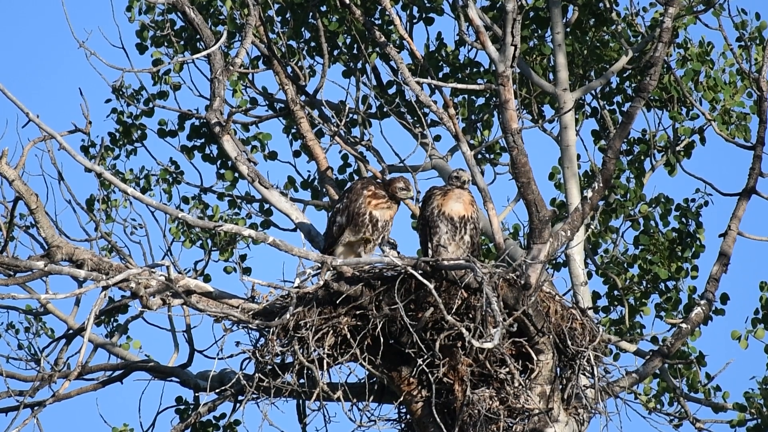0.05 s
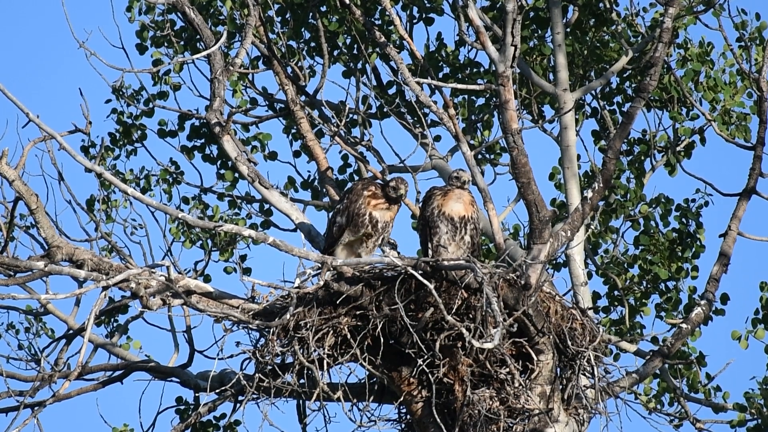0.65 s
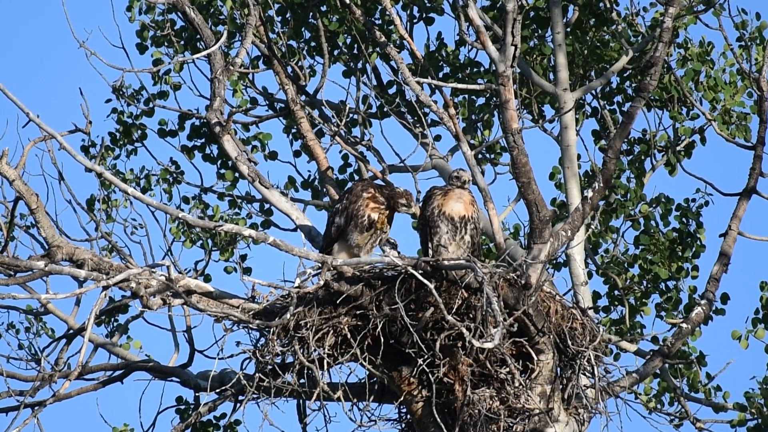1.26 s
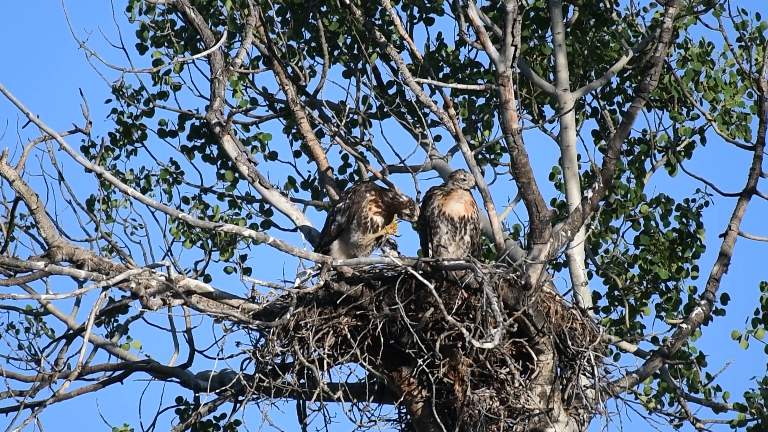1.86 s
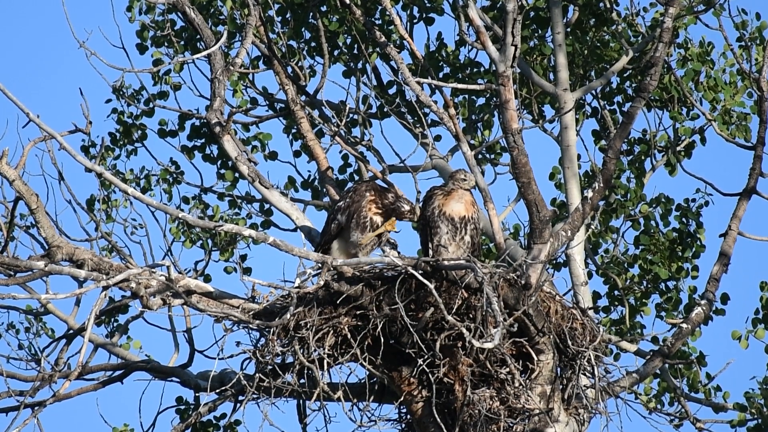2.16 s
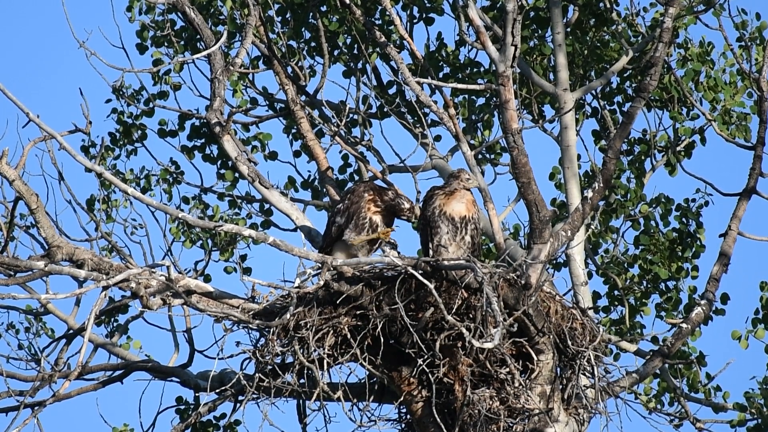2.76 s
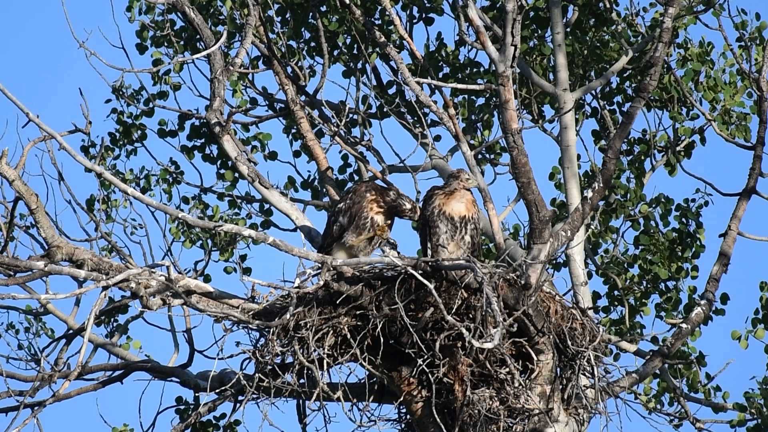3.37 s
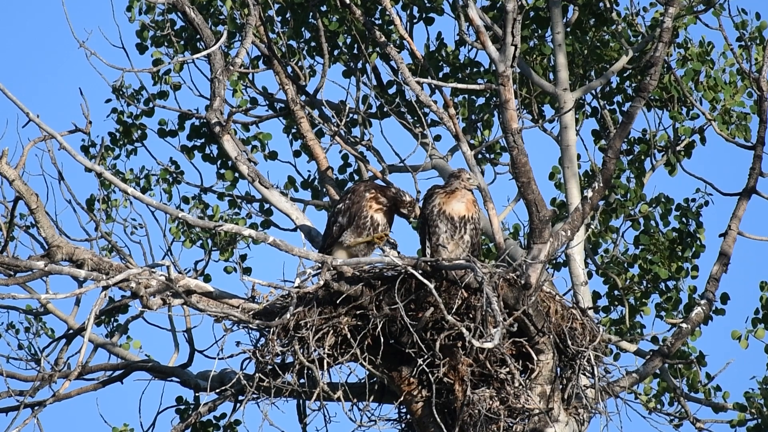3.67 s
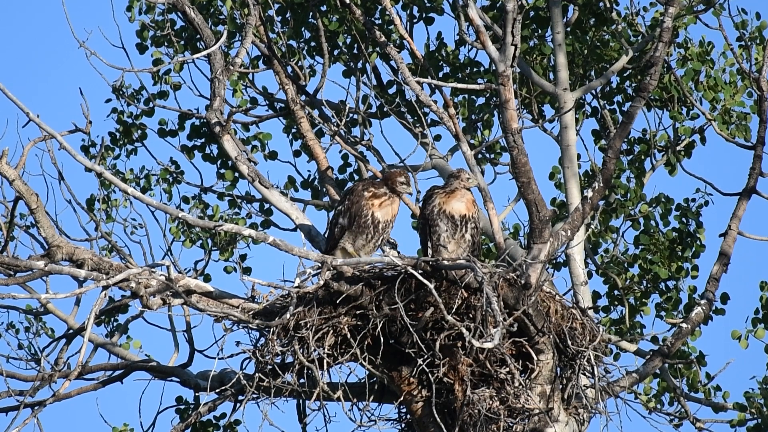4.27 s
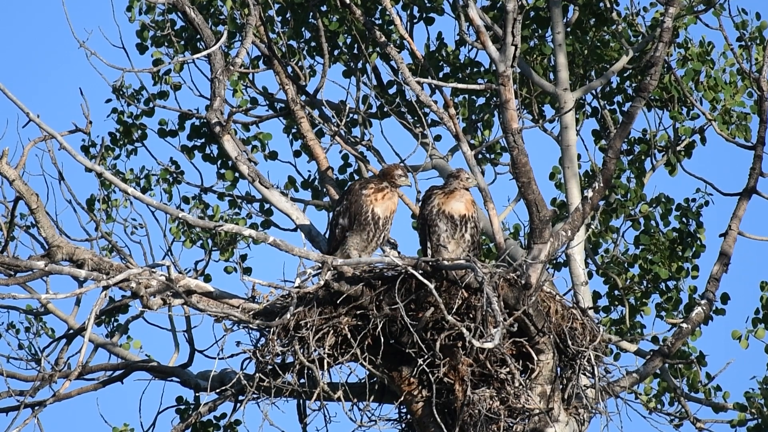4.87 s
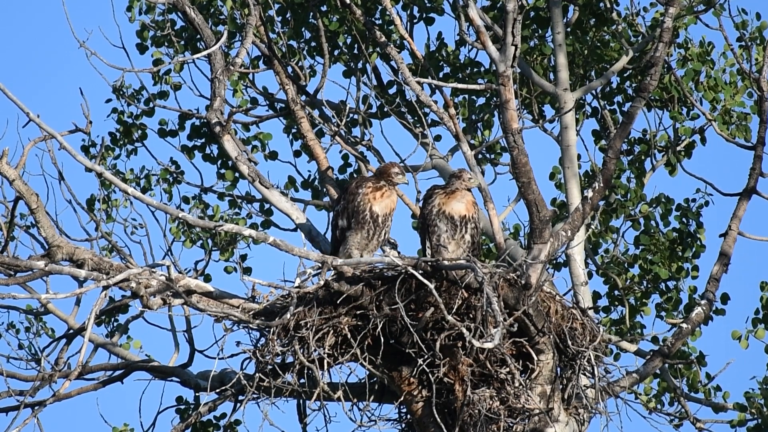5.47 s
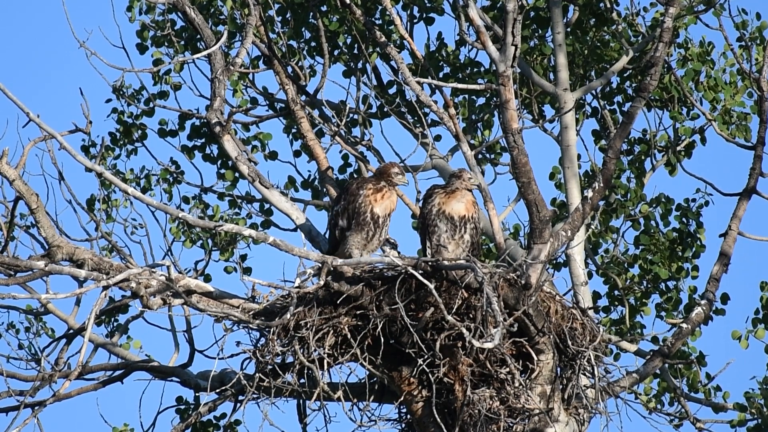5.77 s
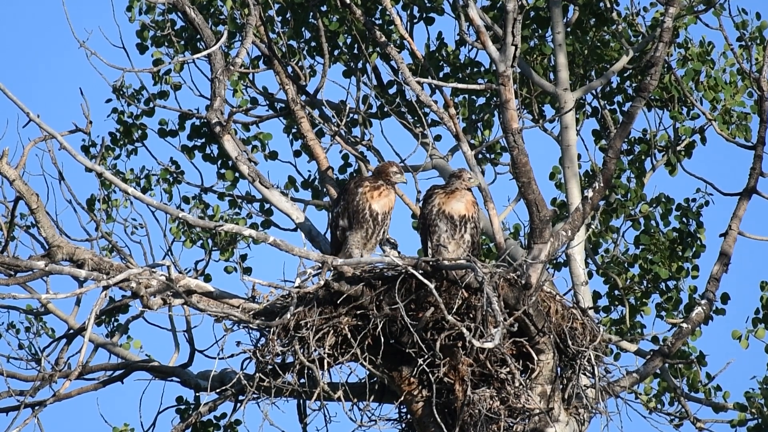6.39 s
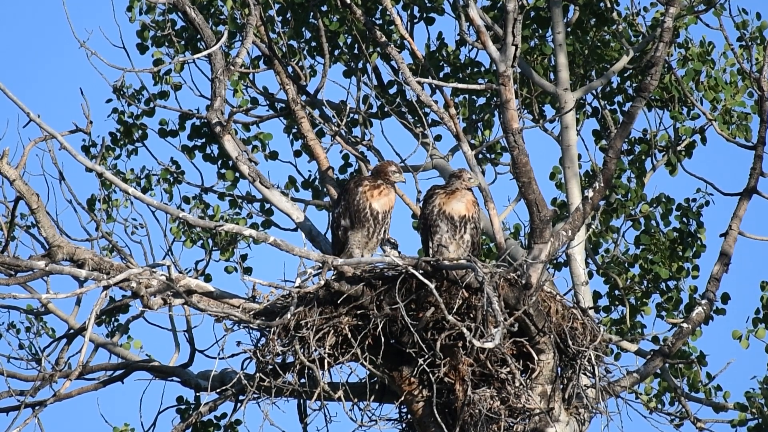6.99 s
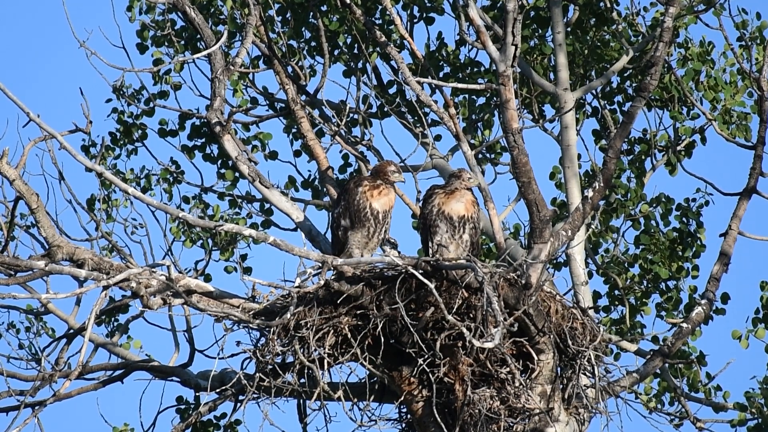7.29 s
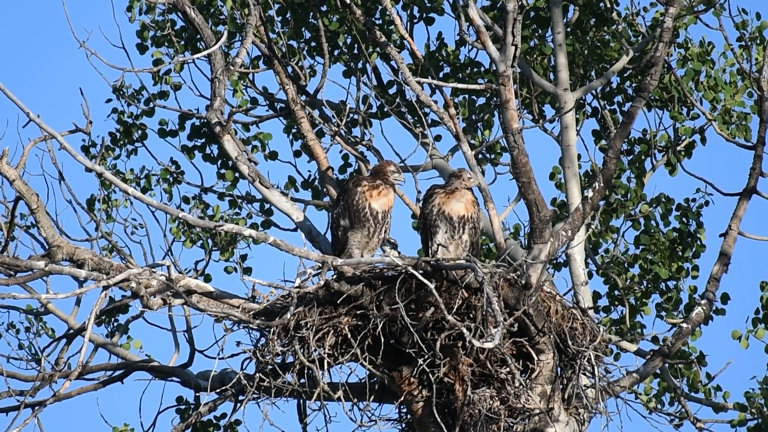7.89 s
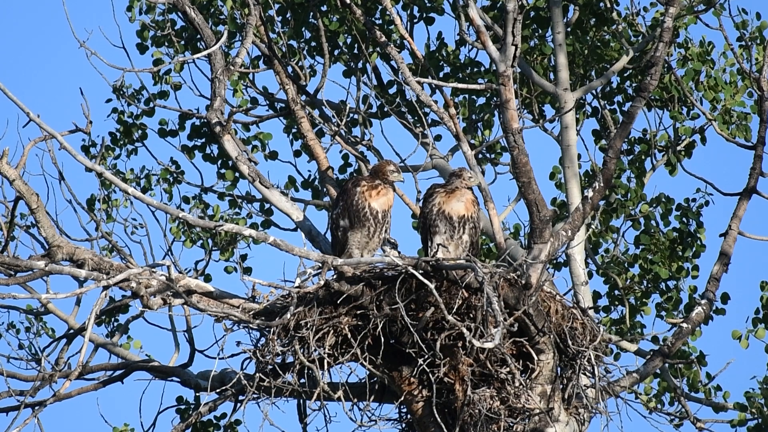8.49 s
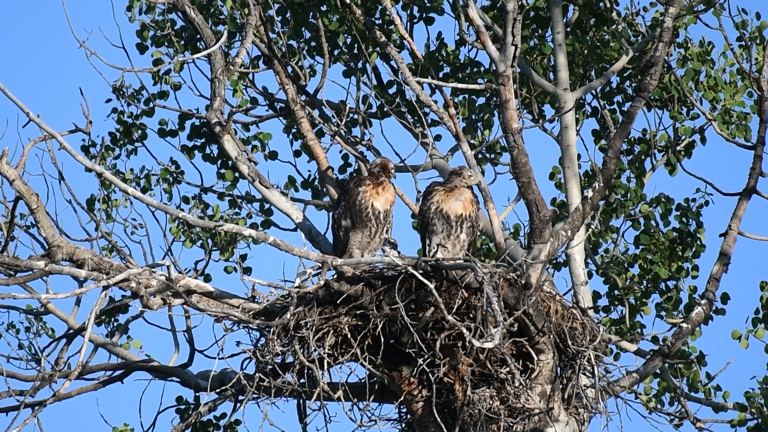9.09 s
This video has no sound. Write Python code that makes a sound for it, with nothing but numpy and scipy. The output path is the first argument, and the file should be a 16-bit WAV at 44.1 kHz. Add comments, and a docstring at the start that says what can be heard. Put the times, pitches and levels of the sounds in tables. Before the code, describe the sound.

Young hawks give thin, cracking whistles in a tree, after a nearer songbird sings one quick, loud phrase over faint distant chirps.

```python
"""A soft hush of air and microphone hiss comes first, and in it a faint whistle from a nest high in a leafy
tree, left of the microphones. Two young hawks call there, louder later on, their voices cracking between a low
and a high register. Three dry ticks and two hoarse squawks pass; small birds chirp far off. A nearer songbird
sings one quick, loud phrase of gliding notes. Leaves scatter every call on its way to the stereo pair, and two
narrow notches dip the treble."""
import sys
import numpy as np
from scipy import signal
from scipy.fft import rfft, irfft
from scipy.io import wavfile
from scipy.ndimage import uniform_filter1d

SR = 44100
rng = np.random.default_rng(int(sys.argv[2]) if len(sys.argv) > 2 else 0)


def generate_wav(sig):
    """Save sig (samples, or channels by samples) to the path in sys.argv[1] as 16-bit PCM at SR."""
    pcm = np.round(np.clip(np.atleast_2d(sig).T, -1, 1) * 32767).astype(np.int16)
    wavfile.write(sys.argv[1], SR, pcm)


N = 407484
TIME = np.arange(N) / SR
ALONG = np.linspace(0, 1, 101)  # share of the way through a note or one flank of it


def from_db(db):
    """Decibels to gain."""
    return 10 ** (np.asarray(db) / 20)


def at_hz(points, hz):
    """Read a spectrum on a log-frequency axis."""
    f, value = np.transpose(points)
    return np.interp(np.log(np.maximum(hz, 1)), np.log(f), value)


def drift(size, rate):
    """A random wander of spread about 1, turning rate times a second."""
    steps = np.arange(size) * rate / SR
    return np.interp(steps, np.arange(2048), rng.standard_normal(2048))


def contour(rows, glide_s=.003, edge_s=.0027):
    """A note's first sample, its soft on-off gate, and its columns joined with rounded corners."""
    s, *columns = np.transpose(rows)
    s = np.maximum.accumulate(s)
    t = np.arange(s[0] - edge_s, s[-1] + edge_s, 1 / SR)
    from_edge_s = np.minimum(t - t[0], t[-1] - t)
    gate = np.sin(np.pi / 2 * np.clip(from_edge_s / (2 * edge_s), 0, 1)) ** 2
    curves = [uniform_filter1d(np.interp(t, s, c), max(int(glide_s * SR), 1)) for c in columns]
    return max(int(t[0] * SR), 0), gate, *curves


def arch(times, pitches, rise, fall, hold_s=0):
    """Times and pitches of a note that climbs and comes down; rise and fall run from foot 0 to top 1."""
    (start_s, top_s, end_s), (start_hz, top_hz, end_hz) = times, pitches
    s = np.r_[start_s + (top_s - start_s) * ALONG, np.linspace(top_s + hold_s, end_s, len(ALONG))]
    return s, np.r_[start_hz + (top_hz - start_hz) * rise, end_hz + (top_hz - end_hz) * fall[::-1]]


def tone(hz, level_db):
    """A gliding sine of the given rms level."""
    return np.sqrt(2) * from_db(level_db) * np.sin(2 * np.pi * np.cumsum(hz) / SR)


def add(track, start, sound):
    """Mix a sound into a track."""
    part = track[..., start:start + sound.shape[-1]]
    part += sound[..., :part.shape[-1]]


def panned(x, left_db):
    """Share a sound between the two microphones at constant power."""
    gains = from_db(np.array([[1], [-1]]) * left_db / 2)
    return x * gains / np.sqrt(np.mean(gains ** 2, axis=0))


def left_leads(pair, lead_s):
    """A sound from the left reaches the right microphone later."""
    return np.array([pair[0], np.interp(TIME - lead_s, TIME, pair[1])])


def foliage(pair, near_db, near_t60, far_db, far_t60):
    """Direct sound, a quick scatter off nearby twigs and a longer one off the trees around."""
    t = TIME[:SR]
    out = pair
    for level_db, t60 in ((near_db, near_t60), (far_db, far_t60)):
        echoes = rng.standard_normal((2, SR)) * from_db(-60 * t / t60) * (1 - np.exp(-t / .012))
        echoes /= np.sqrt(np.sum(echoes ** 2, axis=1, keepdims=True))
        out = out + from_db(level_db) * signal.fftconvolve(pair, echoes, axes=1)[:, :N]
    return out


# open air and microphone hiss: f/Hz, density/dB per Hz
HUSH_SPECTRUM = [(25, -117), (60, -107), (120, -101), (200, -97.5), (400, -97), (800, -99), (1500, -99),
                 (2100, -100), (3500, -101), (5000, -103), (7000, -107), (9500, -109), (15000, -115)]
# how alike the two microphones hear it: f/Hz, likeness/0-1
MIC_LIKENESS = [(60, 0.66), (130, 1), (290, 0.98), (640, 0.77), (1400, 0), (15000, 0.12)]
# thin whine of the electronics: f/Hz, level/dB
WHINE_TONES = [(5265, -91), (10530, -96), (11703, -94), (12871, -100), (14045, -101)]
def hush():
    """Steady noise, alike at both microphones in the bass and unrelated above, with a faint whine."""
    hz = np.fft.rfftfreq(N, 1 / SR)
    mid, side = rfft(rng.standard_normal((2, N)))
    alike = at_hz(MIC_LIKENESS, hz)
    pair = np.sqrt(1 + alike) * mid + np.sqrt(1 - alike) * side * [[1], [-1]]
    air = irfft(pair * from_db(at_hz(HUSH_SPECTRUM, hz)), N) * np.sqrt(SR) / 2
    return air + sum(tone(np.full(N, f), db) for f, db in WHINE_TONES)


def cracking_whistle(row, crack_s=.004, fade_in_db=14, lead_sag=.18, tail_sag=.13):
    """A high arch, most often cracking up from a low lead-in and down to a low tail: t/s, f/Hz, level/dB."""
    shape, hold_s, fade_s, _, level_db, _, lead_s, lead_db, tail_s, tail_db, crack_hz = row[6:]
    start_s, _, end_s = row[:3]
    flank = np.sin(np.pi / 2 * ALONG) ** shape
    s, hz = arch(row[:3], row[3:6], flank, flank, hold_s)
    parts = [(s, hz, level_db - fade_in_db * np.clip(1 - (s - start_s) / fade_s, 0, 1))]
    # the low register is lower and softer the farther it is from the crack
    if lead_s > crack_s:
        away = (1 - ALONG) ** 2
        lead_hz = crack_hz * (1 - lead_sag * away)
        parts.insert(0, (start_s - crack_s - lead_s * (1 - ALONG), lead_hz, lead_db - 3 * away))
    if tail_s > crack_s:
        tail_hz = crack_hz * (1 - tail_sag * ALONG ** .8)
        parts.append((end_s + crack_s + tail_s * ALONG, tail_hz, tail_db - 6 * ALONG))
    return np.hstack(parts).T


# calls from the nest, levels before the throat (the second row is the whistled start of the first squawk):
# start t/s, top t/s, end t/s, start f/Hz, top f/Hz, end f/Hz, arch shape (under 1 flat, 2 bell-like), hold/s,
# fade-in/s, lean left/dB, level/dB, extra octave/dB, lead-in/s, lead-in level/dB, tail/s, tail level/dB, low
# side of the crack f/Hz
HAWK_CALLS = [ (0.03, 0.11, 0.2, 3085, 3060, 3080, 1, 0, .08, 14, -67, -6, 0, 0, 0, 0, 0),
              (0.562, 0.571, 0.612, 3280, 3360, 3000, 2, 0, .003, 13, -51.5, -11, 0, 0, 0, 0, 0),
              (3.795, 3.93, 4.05, 2970, 3285, 3160, 1.1, 0, .03, 7.5, -64.5, 0, 0, 0, 0, 0, 0),
              (4.05, 4.17, 4.232, 3110, 3295, 3120, 2, 0, .025, 7.5, -60.5, -6, 0, 0, 0, 0, 0),
              (4.716, 4.838, 4.91, 3345, 3810, 3350, 2, 0, .028, 5.3, -49.5, -9, .055, -58, .04, -60, 2500),
              (5.243, 5.262, 5.41, 3400, 3400, 2720, 1.8, .01, .012, 4.5, -53.5, -6, .11, -53.5, .048, -52.5, 2580),
              (5.319, 5.472, 5.546, 3330, 4220, 3350, 2.1, 0, .003, 5, -49.5, -9, .048, -58, .025, -59, 2530),
              (5.965, 6.088, 6.211, 3300, 4380, 3330, 1.8, .062, .015, 7.3, -48.5, -2, .033, -59, .024, -60, 2480),
              (6.116, 6.125, 6.24, 3270, 3255, 3110, .7, .085, .003, 6.7, -49, -5, .152, -51, .044, -48.5, 2680),
              (6.773, 6.89, 7.03, 3150, 3385, 3080, .9, .1, .002, 4.9, -47.5, 1, .033, -55, .037, -49, 2620),
              (7.7, 7.93, 7.991, 2850, 3410, 3110, .5, 0, .025, 6.3, -49, 4, 0, 0, .04, -46.5, 2700), ]
# the throat each call glides through: f/Hz, fundamental gain/dB, octave against it/dB
HAWK_THROAT = [(2100, -6, -11), (2330, 0, -5), (2700, 0, -4), (2780, -6, -17), (2950, -7, -17),
               (3100, 2, -11), (3260, 0.5, -20), (3400, 0.5, -21.5), (3520, -4, -28), (3700, -12.5, -24),
               (3950, -11, -21), (4280, -1.5, -21)]
def hawks(waver=.0037, rasp=.006, flutter_db=1.9, third_db=-19, low_share=.4):
    """High in the tree, to the left: nearly pure whistles whose octave stands out in the low register."""
    out = np.zeros((2, N))
    throat_hz, pass_db, second_db = np.transpose(HAWK_THROAT)
    for row in HAWK_CALLS:
        left_db, _, extra_db = row[9:12]
        start, gate, hz, effort_db = contour(cracking_whistle(row))
        level_db = effort_db + np.interp(hz, throat_hz, pass_db)
        extra_share = at_hz([(2650, low_share), (2850, 1)], hz)
        octave_db = level_db + extra_share * extra_db + np.interp(hz, throat_hz, second_db)
        # the voice drops out for an instant while it cracks between registers
        octaves_per_s = np.abs(np.gradient(np.log2(hz))) * SR
        gate = gate / (1 + (octaves_per_s / 35) ** 4)
        hz = hz * (1 + waver * drift(len(hz), 119) + rasp * drift(len(hz), 1200))
        partials = [(1, level_db), (2, octave_db), (3, octave_db + third_db)]
        voice = sum(tone(k * hz, db + at_hz([(8000, 0), (13000, -20)], k * hz)) for k, db in partials)
        flutter = from_db(flutter_db * drift(len(hz), 123.2))
        add(out, start, panned(voice * gate * flutter, left_db))
    return foliage(out, near_db=-14, near_t60=.15, far_db=-11, far_t60=1.1)


# faint ticks at both microphones: t/s, level before the filter/dB
DRY_TICKS = [(.234, -45), (8.209, -45), (9.144, -43)]
def ticks(decay_s=.0023):
    """Tiny bright snaps of noise, with no echo."""
    out, t = np.zeros((2, N)), TIME[:SR // 20]
    for s, level_db in DRY_TICKS:
        snap = rng.standard_normal((2, len(t))) * np.exp(-t / decay_s)
        add(out, int(s * SR), from_db(level_db) / 2 * snap)
    return signal.sosfilt(signal.butter(1, [3000, 11000], "band", fs=SR, output="sos"), out)


def far_glides(rows, bend, flutter_db=3):
    """Little whistles that glide fast, then flatten, swelling midway; distance dulls their tops."""
    out = np.zeros(N)
    for s, length, from_hz, to_hz, level_db in rows:
        along = np.linspace(0, 1, max(int(length * SR), 2))
        hz = to_hz + (from_hz - to_hz) * ((1 - along) ** (2 * bend) + (1 - along)) / 2
        dulled_db = level_db + at_hz([(5500, 0), (7000, -6)], hz)
        voice = tone(hz, dulled_db + flutter_db * drift(len(hz), 150))
        add(out, int(s * SR), voice * np.sqrt(np.abs(np.sin(np.pi * along))))
    return out


# small birds far off in the trees: t/s, length/s, start f/Hz, end f/Hz, relative level/dB
FAR_CHIRPS = [(0.255, 0.027, 3950, 3520, -66), (0.355, 0.072, 5900, 3550, -66.5),
              (0.87, 0.021, 4560, 4020, -57), (0.965, 0.025, 4750, 4090, -61),
              (1.02, 0.039, 3550, 4430, -61), (1.09, 0.027, 3480, 4340, -60.5),
              (1.52, 0.13, 1880, 1690, -76), (2.415, 0.029, 4870, 5100, -67),
              (3.725, 0.12, 5100, 3540, -66), (4.455, 0.017, 3480, 4860, -64),
              (4.478, 0.025, 3040, 2980, -59), (7.17, 0.055, 5050, 4200, -66),
              (7.375, 0.042, 4200, 3100, -66), (7.655, 0.031, 4650, 3400, -63.5),
              (8.525, 0.04, 4700, 3700, -69), (8.755, 0.019, 1950, 2110, -68),
              (8.893, 0.046, 4600, 5400, -67.5), (8.92, 0.034, 1860, 1800, -70)]
def chirps():
    """Single, sharply bent whistles."""
    return far_glides(FAR_CHIRPS, bend=3)


# nasal squawks well to the left, one list a call: t/s, f/Hz, level/dB
SQUAWK_CALLS = [
    [(0.612, 2000, -56), (0.635, 1880, -50.5), (0.66, 1720, -46), (0.69, 1590, -50), (0.712, 1420, -42.5),
     (0.725, 1220, -65), (0.735, 1110, -48), (0.755, 1050, -51.5), (0.78, 960, -54)],
    [(4.485, 2080, -69), (4.51, 1920, -52), (4.55, 1720, -56), (4.59, 1570, -56.5), (4.62, 1370, -50.5),
     (4.64, 1320, -59)],
]
# the throat shape of each: f/Hz, relative gain/dB
SQUAWK_THROATS = [
    [(1000, -10), (1500, -16), (2100, -5), (3100, 1), (3800, -7), (4400, -24), (5300, -30), (7000, -15),
     (9000, -17), (12000, -36)],
    [(1300, -10), (1850, 2), (2700, 2), (3600, -8), (4500, -14), (6000, -10), (7200, -22), (12000, -36)],
]
def squawks(rasp=.0118, flutter_db=3):
    """A hoarse stack of ten harmonics slides down through the throat's resonances."""
    out = np.zeros(N)
    for rows, throat in zip(SQUAWK_CALLS, SQUAWK_THROATS):
        start, gate, hz, level_db = contour(rows)
        hz = hz * (1 + rasp * drift(len(hz), 614))
        stack_hz = np.outer(np.arange(1, 11), hz)
        shape_db = at_hz(throat, stack_hz)
        shape_db -= 10 * np.log10(np.sum(from_db(shape_db) ** 2, axis=0))  # keep the total power
        for f, db in zip(stack_hz, shape_db):
            add(out, start, gate * tone(f, level_db + db + flutter_db * drift(len(hz), 80)))
    pair = left_leads(panned(out, left_db=9), lead_s=.00022)
    return foliage(pair, near_db=-9.5, near_t60=.17, far_db=-14.5, far_t60=.94)


# one buzzy note, far off: t/s, f/Hz, relative level/dB
FAR_BUZZ = [(.62, 4530, -67), (.68, 4590, -63), (.78, 4490, -65), (.87, 4430, -65)]
def buzz(trill_hz=90, swing_hz=260):
    """A whistle whose pitch swings so rapidly that it buzzes."""
    out = np.zeros(N)
    start, gate, hz, level_db = contour(FAR_BUZZ)
    swing = swing_hz * np.sin(2 * np.pi * trill_hz * TIME[:len(hz)])
    add(out, start, gate * tone(hz + swing, level_db))
    return out


# distant runs: from t/s, until t/s, spacing/s, length/s, start f/Hz, end f/Hz, relative level/dB
FAR_RUNS = [(1.178, 1.9, .158, .08, 5600, 3140, -70), (4.65, 5.2, .215, .11, 6950, 4430, -66)]
def runs():
    """A bird repeats one falling slur at an even pace."""
    rows = [(s, *note) for from_s, until_s, spacing, *note in FAR_RUNS
            for s in np.arange(from_s, until_s, spacing)]
    return far_glides(rows, bend=2.5)


# the near songbird's opening: t/s, length/s, from f/Hz, to f/Hz, opening flick/Hz, level/dB
SONG_SLURS = [(2.466, .09, 6700, 5050, 250, -46.5), (2.688, .094, 6600, 5020, 850, -35.5),
              (2.926, .098, 7050, 4860, 1700, -33.3)]
# their common shape: share of the length, share of the fall still to come, gain/dB
SLUR_SHAPE = [(0, 1, -21), (.09, .9, -3.5), (.2, .76, -2.5), (.42, .5, 0), (.6, .25, -.5), (.75, .07, -4.5),
              (.88, 0, -5.5), (1, .08, -6.5)]
def song_slurs(flick_s=.005):
    """Falling whistles that open with a quick downward flick."""
    share, fall, shape_db = np.transpose(SLUR_SHAPE)
    for s, length, from_hz, to_hz, flick_hz, db in SONG_SLURS:
        hz = to_hz + (from_hz - to_hz) * np.interp(ALONG, share, fall)
        hz += flick_hz * np.exp(-length * ALONG / flick_s)
        yield s + length * ALONG, hz, db + np.interp(ALONG, share, shape_db)


# pips between the slurs: t/s, length/s, f/Hz, loudest point as a share of the length, level/dB
SONG_PIPS = [(2.638, .038, 5435, .72, -38.5), (2.884, .034, 5405, .48, -36.5)]
def song_pips(swell_db=18, release_db=9):
    """Short notes on one pitch that swell and fade."""
    for s, length, hz, loudest, db in SONG_PIPS:
        attack = swell_db * (1 - ALONG / loudest) ** 2
        release = release_db * ((ALONG - loudest) / (1 - loudest)) ** 2
        yield s + length * ALONG, np.full_like(ALONG, hz), db - np.where(ALONG < loudest, attack, release)


# the phrase's second half: start t/s, top t/s, end t/s, start f/Hz, top f/Hz, end f/Hz, level/dB
SONG_ARCHES = [(3.078, 3.096, 3.127, 3500, 4560, 3200, -36), (3.241, 3.26, 3.296, 3950, 4540, 3330, -34),
               (3.405, 3.438, 3.496, 4080, 5300, 3080, -34), (3.566, 3.596, 3.648, 3900, 5300, 3030, -37)]
# the throat that then colours these notes: f/Hz, gain/dB
SONG_THROAT = [(3050, -21), (3380, -9.5), (3700, -12), (4100, -13), (4360, -1), (4900, 1), (5300, -1)]
def song_arches(swell_db=8):
    """Notes that swell as they climb, then drop in pitch."""
    onset_db = np.r_[swell_db * (1 - ALONG) ** 2, np.zeros_like(ALONG)]
    for row in SONG_ARCHES:
        s, hz = arch(row[:3], row[3:6], rise=ALONG, fall=ALONG ** 1.6)
        yield s, hz, row[-1] + at_hz(SONG_THROAT, hz) - onset_db


# the loudest notes at the microphones: t/s, length/s, level/dB
SONG_UPSWEEPS = [(3.133, .054, -27.7), (3.303, .046, -26)]
# their common shape: share of the length, f/Hz, gain/dB
UPSWEEP_SHAPE = [(0, 4900, -20), (.12, 4790, -17), (.19, 4760, -9), (.38, 5300, -7), (.555, 5870, 0),
                 (.75, 6400, -6), (.87, 6720, -13), (1, 5800, -20)]
def song_upsweeps():
    """Rising whistles between the arches, hooked down at the end."""
    share, hz, shape_db = np.transpose(UPSWEEP_SHAPE)
    for s, length, db in SONG_UPSWEEPS:
        yield s + length * share, hz, db + shape_db


def songbird(waver=.0045, octave_db=-32):
    """Nearer the microphones, a little left: clean, fast glides with a trace of the octave."""
    out = np.zeros((2, N))
    for note in (*song_slurs(), *song_pips(), *song_arches(), *song_upsweeps()):
        start, gate, hz, level_db = contour(np.transpose(note), glide_s=.0026, edge_s=.0014)
        hz = hz * (1 + waver * drift(len(hz), 405))
        colour_db = at_hz([(8500, 9.5), (10000, 2.5), (11500, -20)], 2 * hz)
        voice = tone(hz, level_db) + tone(2 * hz, level_db + octave_db + colour_db)
        left_db = at_hz([(3500, 6), (5000, 1), (6500, .4)], hz)  # lower notes lean farther left
        add(out, start, panned(gate * voice, left_db))
    return foliage(left_leads(out, lead_s=8 / SR), near_db=-8, near_t60=.14, far_db=-12, far_t60=.8)


# one round of a distant twitter: t/s into the round, length/s, start f/Hz, end f/Hz, gain/dB
TWITTER_MOTIF = [(0, .022, 4340, 5770, 1.5), (0.039, 0.0202, 6180, 5240, 1.5),
                 (0.057, .014, 5900, 4500, -25), (.094, 0.0096, 5200, 5640, -6)]
# its rounds: t/s, relative level/dB
TWITTER_ROUNDS = [(5.61, -63.5), (5.719, -60), (5.825, -59.5), (5.937, -59)]
def twitter():
    """Far off and slightly right, more scatter than direct sound: a bird repeats one quick motif."""
    rows = [(s + lag, length, from_hz, to_hz, db + note_db) for s, db in TWITTER_ROUNDS
            for lag, length, from_hz, to_hz, note_db in TWITTER_MOTIF]
    pair = panned(far_glides(rows, bend=.59), left_db=-1.5)
    return from_db(-5) * foliage(pair, near_db=0, near_t60=.1, far_db=2.5, far_t60=.55)


# the farthest birds: from t/s, to t/s, number of chirps, relative level/dB
FAR_CHATTER = [(6.55, 7.35, 8, -72), (7.35, 7.97, 12, -72), (8.5, 9.0, 7, -73)]
def chatter(length_s=.03):
    """Soft falling chirps at random moments and pitches."""
    rows = []
    for from_s, to_s, count, level_db in FAR_CHATTER:
        for when, pitch, loudness in rng.random((count, 3)):
            s = from_s + when * (to_s - from_s)
            top_hz = 4200 + 1400 * pitch
            rows.append((s, length_s, top_hz, .8 * top_hz, level_db + 6 * (loudness - .5)))
    return far_glides(rows, bend=.99)


def scene():
    """All that reaches the microphones; most far birds share one leafy path from a little to the left."""
    far_birds = panned(chirps() + buzz() + runs() + chatter(), left_db=3)
    far_birds = from_db(-.5) * foliage(far_birds, near_db=-5, near_t60=.1, far_db=-4, far_t60=.8)
    return hush() + hawks() + ticks() + far_birds + squawks() + songbird() + twitter()


# two narrow dips in the treble: f/Hz, width/Hz
TREBLE_NOTCHES = [(2600, 800), (7700, 1300)]
CUTOFF_HZ = 15700
def record(dry):
    """Two narrow notches in the treble, then the recorder's steep cut of the top."""
    for hz, width in TREBLE_NOTCHES:
        dry = signal.lfilter(*signal.iirnotch(hz, hz / width, fs=SR), dry)
    return signal.sosfilt(signal.ellip(12, .1, 80, CUTOFF_HZ, fs=SR, output="sos"), dry)


dry = scene()
out = record(dry)
generate_wav(out)
```